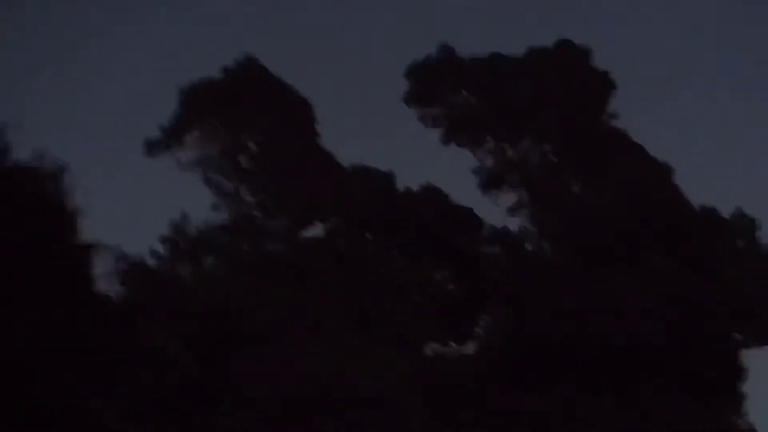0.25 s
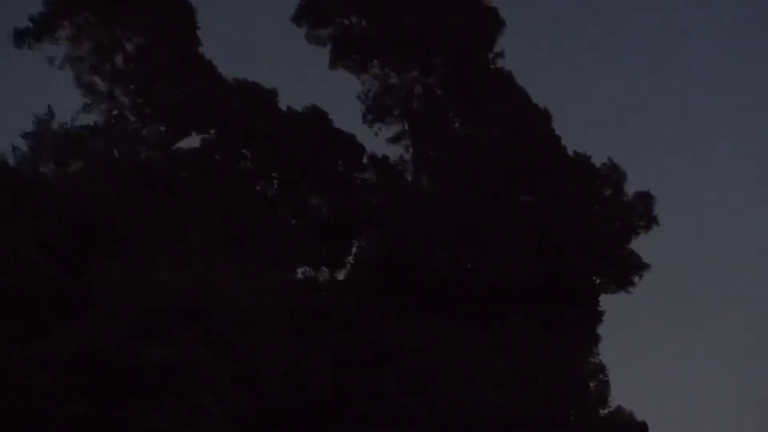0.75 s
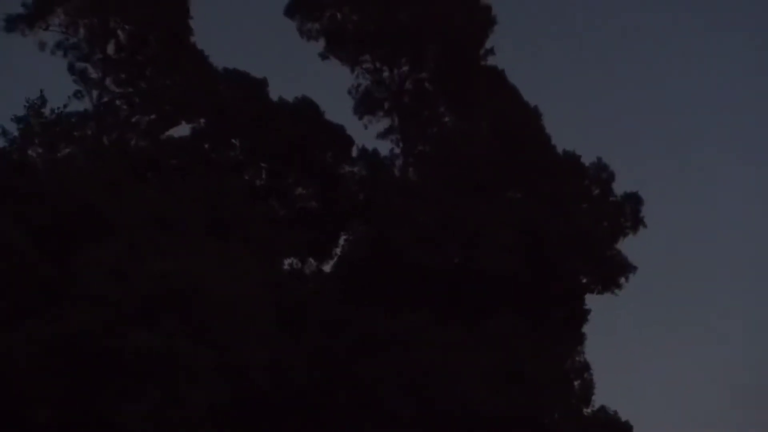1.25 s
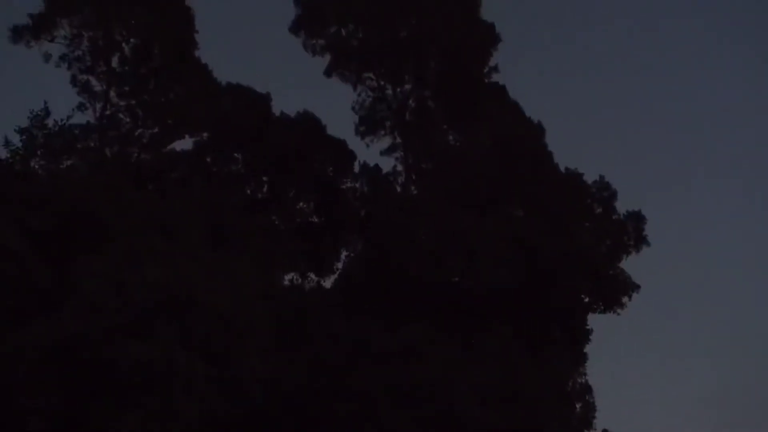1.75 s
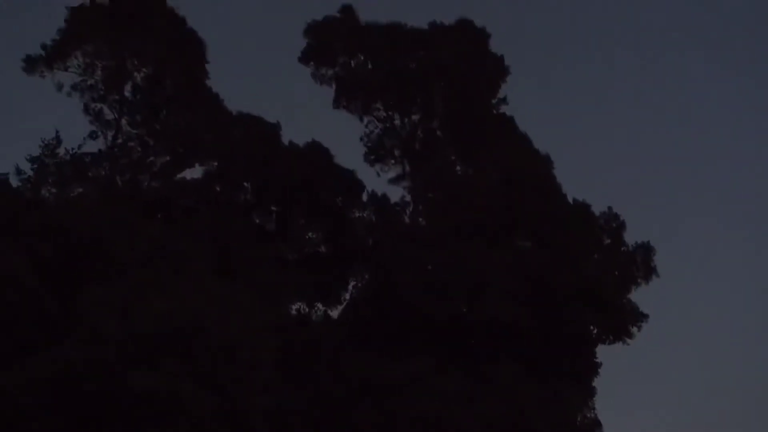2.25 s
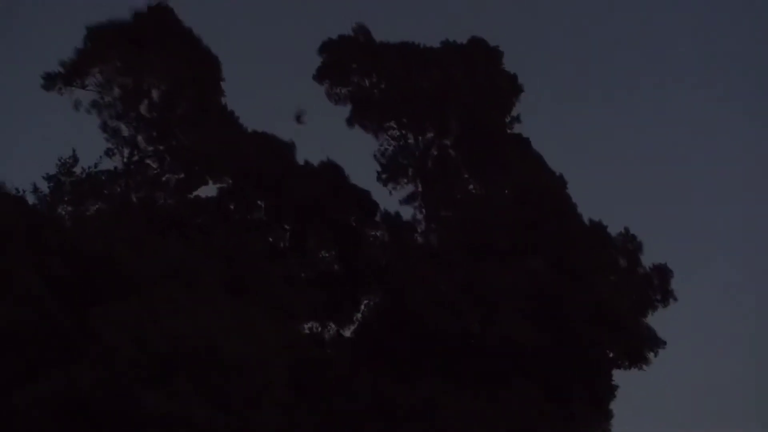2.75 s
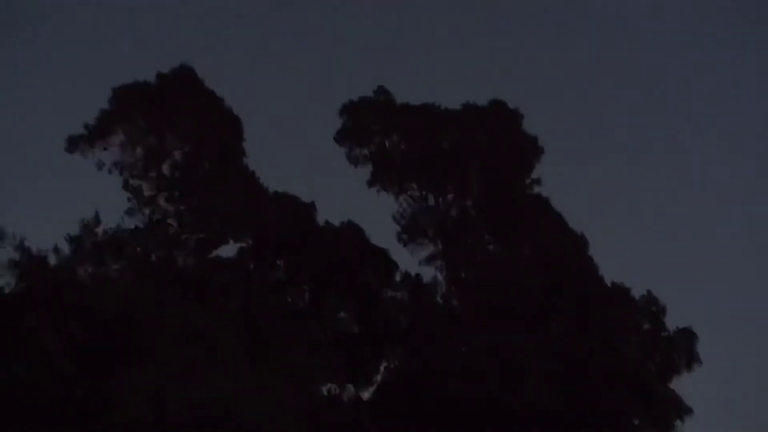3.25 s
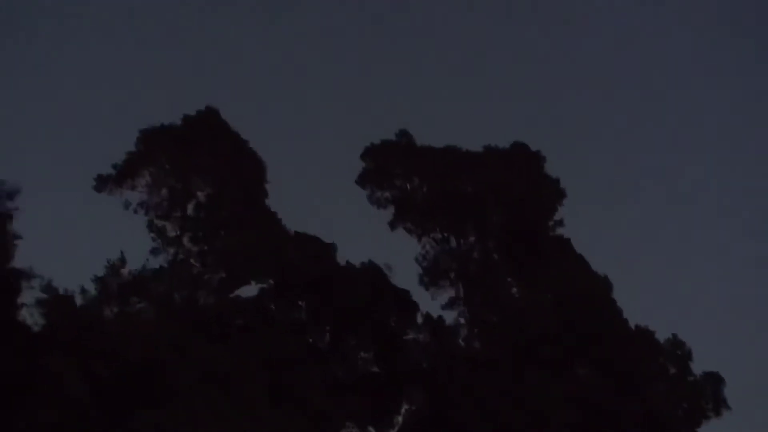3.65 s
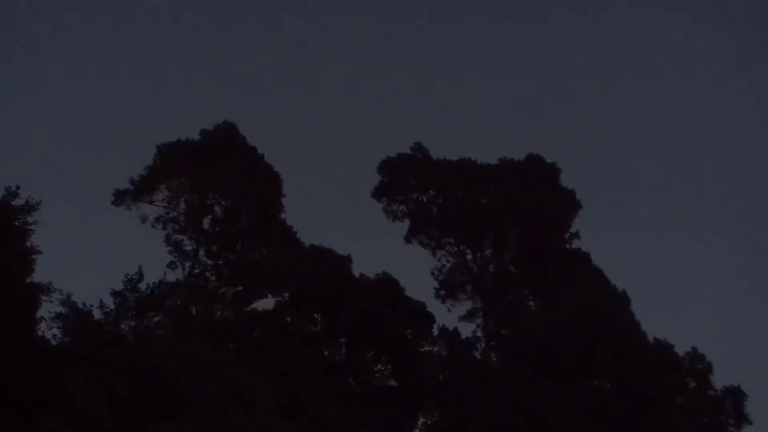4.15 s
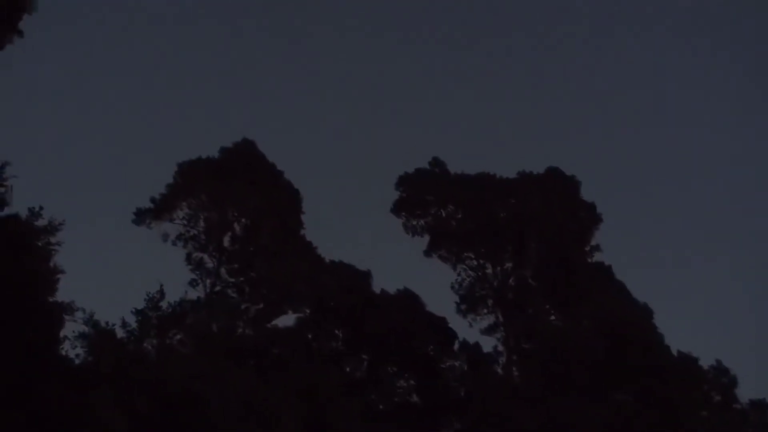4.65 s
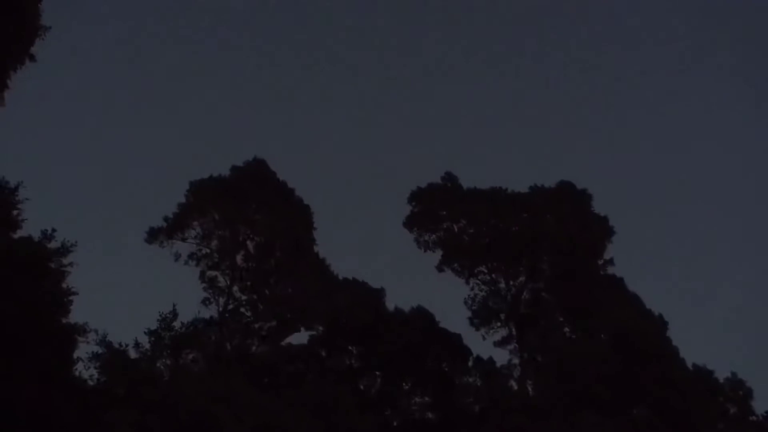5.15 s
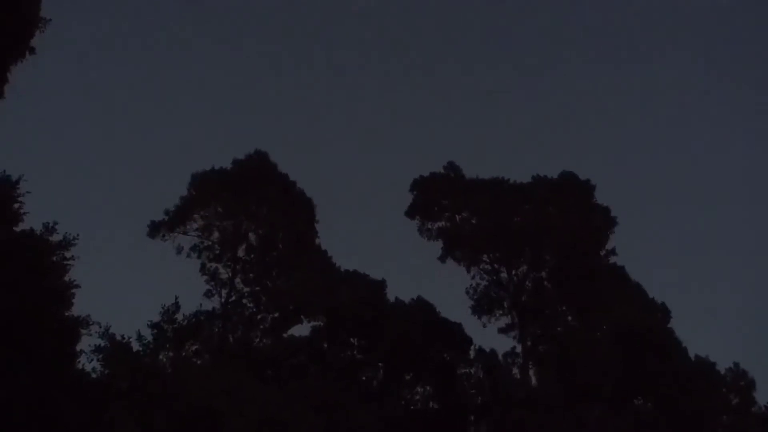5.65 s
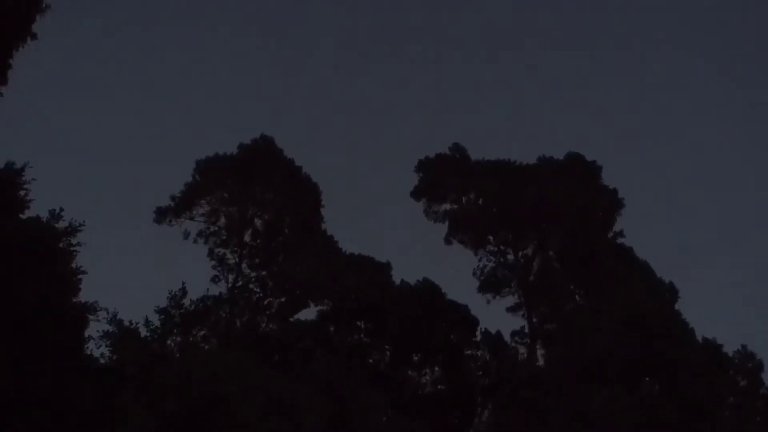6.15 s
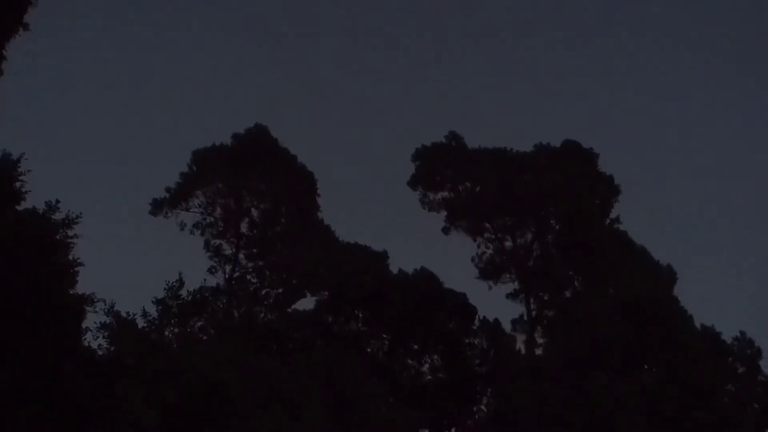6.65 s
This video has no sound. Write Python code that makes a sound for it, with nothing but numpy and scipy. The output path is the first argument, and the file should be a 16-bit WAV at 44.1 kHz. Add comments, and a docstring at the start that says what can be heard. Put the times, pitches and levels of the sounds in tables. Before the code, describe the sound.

Evening chatter of mynas roosting in tall trees, about seven seconds, outdoors in stereo. From the start a close bird pours out very short, bright syllables around 2.5 to 4 kHz: zigzag trills, flicked warbles, stepped falling calls, hooked notes and smooth slides, several per second, some pure and some raspy. Nearby birds trill across it. A distant mass of thin gliding chirps swells in the first second, peaks near 1 s, then recedes behind. At about 1.2 s a brief low puff of wind buffets the microphone, mostly on the left. Around 2.5 s come strong, tightly repeated chirps, then a long downward swoop near 2.8 s. Near 4.5 s a faint high whistle drifts up. Calls stay busy until about 6.1 s, then become sparse and weaker. Branches return rough little echoes and a short diffuse tail. A quiet low rumble with slight hiss grows very slowly while a faint hum fades.

```python
"""Mynas chatter in tall trees at dusk, over a low outdoor rumble that grows slowly and a hum that fades. From
the start a near bird, a gliding tone in a resonant throat, strings together trills, warbles, stair calls, hooks
and slurs; the other side of its syrinx trills across them, and the far roost, pure gliding tones, is loudest
early on. Just after one second a puff of wind, shaped noise, buffets the microphone; near 4.5 s a thin whistle
drifts up. Throughout, branches and canopy scatter the calls into separate echoes and a dense tail."""
import sys
import numpy as np
from scipy import signal
from scipy.fft import rfft, irfft
from scipy.io import wavfile
from scipy.ndimage import uniform_filter1d

SR = 44100
rng = np.random.default_rng(int(sys.argv[2]) if len(sys.argv) > 2 else 0)


def to_wav(sig):
    """Store sig (one row per channel, or 1-D mono) as 16-bit WAV at the path in sys.argv[1].

    Samples outside -1..1 are clipped; the rate is SR.
    """
    pcm = np.clip(np.atleast_2d(sig), -1, 1) * 32767
    pcm = np.round(pcm).astype(np.int16)
    wavfile.write(sys.argv[1], SR, pcm.T)  # frames by channels


N = 303849  # samples

# In the five call tables the level is that before throat and effort act, and the rasp is relative to it.
# Trills, the pitch zigzagging about a rising centre. Each row: start in seconds, length in seconds,
# swings per second, centre pitch in Hz, level in dB, rasp in dB.
TRILLS = [(0.116, 0.065, 90, 2936, -22.5, -20), (0.046, 0.086, 68, 2400, -30, -30),
          (0.97, 0.042, 74, 2880, -29.5, -45), (1.024, 0.06, 76, 2860, -18, -28.5),
          (1.249, 0.046, 96, 2936, -28.5, -26), (1.509, 0.0564, 72, 2957, -17.5, -30),
          (1.754, 0.063, 62, 3070, -19.5, -16), (1.931, 0.044, 88, 3070, -26.5, -22),
          (2.188, 0.06, 66, 2850, -15, -32.5), (2.469, 0.058, 67, 3100, -23, -14.5),
          (2.722, 0.029, 73.6, 2326, -28, -49), (2.75, 0.032, 44, 3500, -28.5, -51),
          (2.823, 0.049, 54, 3000, -17.5, -33), (3.373, 0.056, 52, 3080, -25.5, -11),
          (3.688, 0.062, 71, 2582, -18, -32), (4.275, 0.058, 79, 2506, -15.5, -35),
          (4.677, 0.067, 78, 2913, -21, -34), (4.88, 0.058, 81, 2600, -19.5, -32),
          (5.347, 0.052, 61, 2700, -21, -29), (5.513, 0.0654, 88, 2625, -20, -32),
          (5.604, 0.04, 48, 3305, -21.5, -25), (5.679, 0.049, 48, 2965, -20, -21),
          (5.969, 0.078, 50, 2110, -27, -34.5)]
TRILL_DEPTH, TRILL_RISE = 0.2034, 0.1456  # shares of the centre pitch: swing to each side, climb over the trill
TRILL_UNEVEN = 0.22  # how much the swings differ in depth

# Warbles, an opening note and then a low note flicked upward. Each row: start in seconds,
# opening length in seconds, opening pitch in Hz, low pitch in Hz, level in dB, rasp in dB.
WARBLES = [(1.587, 0.013, 2500, 2358, -18, -24), (2.27, 0.013, 2643, 2403, -16.5, -27.5),
           (2.898, 0.013, 2636, 2436, -16.5, -28.5), (3.962, 0.023, 3360, 2617, -14, -32.5),
           (4.118, 0.016, 3600, 2550, -20, -28), (4.554, 0.02, 3436, 2580, -16, -31),
           (5.172, 0.021, 3350, 2546, -17.5, -31.5), (5.757, 0.0091, 2950, 2408, -20, -20.5),
           (5.815, 0.021, 3350, 2550, -16.5, -34)]
# Flicks of every warble. Each row: time after the opening note in seconds, height in Hz before the
# pitch is smoothed, half width in seconds.
FLICKS = [(0.016, 1434, 0.0065), (0.038, 1400, 0.0087), (0.064, 510, 0.002)]
WARBLE_S, WARBLE_SAG = 0.068, 0.2  # length of the low note in seconds, share of its pitch that it loses

# Stairs, held notes parted by dips. Each row: start in seconds, length in seconds, number of steps,
# pitches in Hz where the staircase sets out and ends, dip as a share of pitch, level in dB, rasp in dB.
STAIRS = [(0.21, 0.088, 3, 4225, 2590, 0.3, -19, -25.5), (0.445, 0.047, 3, 3175, 3214, 0.16, -19, -24.5),
          (0.736, 0.1, 4, 4890, 2627, 0.31, -17.5, -26.5), (1.287, 0.094, 4, 5060, 2986, 0.24, -16, -18.5),
          (1.796, 0.1, 4, 4800, 2797, 0.24, -16, -20), (2.063, 0.12, 2, 3878, 2476, 0.33, -21, -15.5),
          (2.568, 0.033, 2, 3484, 3420, 0.27, -19.5, -20), (3.216, 0.122, 3, 3136, 2348, 0.34, -19, -69),
          (3.774, 0.044, 2, 3300, 2605, 0.29, -17, -29), (4.368, 0.084, 3, 3198, 2660, 0.35, -17, -35),
          (5.003, 0.082, 3, 3175, 2697, 0.37, -17.5, -38), (6.089, 0.048, 2, 3100, 2197, 0.33, -20.5, -33),
          (6.26, 0.089, 3, 3740, 2530, 0.34, -25.5, -30.5), (6.79, 0.046, 2, 3094, 2040, 0.2, -29.5, -23)]
STEP_HOLD, STEP_EDGE = 0.63, 0.0916  # shares of a step: the held note, the leap to or from it
STEP_DROOP = 0.354  # 0 holds each step level, 1 lets it slide into the next

# Hooks, a low grace note leaping to a held note that bends down. Each row: start in seconds,
# grace length in seconds, held length in seconds, held pitch in Hz, level in dB, rasp in dB.
HOOKS = [(0.52, 0.017, 0.062, 3170, -19, -29), (1.094, 0.02, 0.059, 3205, -16, -30),
         (3.444, 0.019, 0.032, 3330, -25, -16.5), (6.025, 0.013, 0.05, 3338, -21.5, -21.5),
         (4.764, 0.017, 0.037, 3194, -19.5, -31.5), (5.426, 0.021, 0.032, 3167, -20, -25)]
GRACE_HZ, HOOK_BEND = 2362, 0.18  # pitch of the grace note; share of the held pitch lost in the bend
HOOK_NOTCH, NOTCH_S = 0.1177, 0.00382  # catch halfway through the held note: share of pitch, half width in s

# Slurs, single even glides. Each row: start in seconds, length in seconds, first pitch in Hz,
# last pitch in Hz, level in dB, rasp in dB.
SLURS = [(0.219, 0.024, 3894, 2406, -18.5, -18), (0.413, 0.03, 2490, 2390, -17, -34),
         (0.403, 0.034, 3410, 3224, -25, -26.5), (0.52, 0.0186, 3540, 4340, -22.5, -24),
         (0.57, 0.052, 4630, 3540, -23.5, -23), (1.683, 0.058, 3920, 2100, -22.5, -26),
         (2.003, 0.058, 2750, 1630, -24.5, -37), (2.497, 0.03, 2956, 2920, -13, -28),
         (2.525, 0.026, 2970, 2950, -12.5, -29), (2.556, 0.0193, 2760, 2660, -13.5, -22.5),
         (2.784, 0.076, 3885, 1375, -16, -37), (3.167, 0.0085, 2860, 2480, -25.5, -39),
         (3.206, 0.057, 4150, 3000, -23, -28.5), (3.449, 0.016, 4820, 4300, -23.5, -7.5),
         (3.641, 0.035, 2640, 2600, -36, -44), (3.74, 0.03, 3060, 3120, -26, -18.5),
         (3.771, 0.033, 3904, 3450, -20.5, -24), (3.951, 0.0045, 3700, 3560, -18, -40),
         (4.361, 0.023, 4080, 3530, -15.5, -25), (4.541, 0.0048, 3840, 3630, -21, -40),
         (4.97, 0.03, 4006, 3493, -20.5, -24), (5.342, 0.049, 3810, 4110, -21.5, -22),
         (5.392, 0.035, 3345, 3190, -26, -15), (5.65, 0.032, 1934, 2276, -19, -29),
         (5.723, 0.078, 2943, 2914, -24.5, -23), (5.761, 0.019, 4695, 4060, -20, -16),
         (6.19, 0.069, 3700, 1880, -37.5, -31)]

FALL_S, FALL_END_HZ = 0.04, 1117  # warbles, stairs and hooks all end in a fall
LEAP_S = 0.0038  # time the syrinx takes to leap between two notes

# Throat and beak resonance, favouring the main tone near 3 kHz. Each row: frequency in Hz, gain in dB.
THROAT = [(900, -19.5), (1500, -14), (2100, -7), (2500, 0), (2950, 3.5), (3900, -1), (5000, -3)]
# Colour of the rasp. Each row: frequency in Hz, gain in dB.
OVERTONES = [(1500, -3), (4400, 2.5), (5600, -2.5), (7000, -3), (8400, -9), (10200, 0.5), (11800, -12),
             (13700, -5.5), (15500, -27)]
EDGE_HZ = 15900  # upper band limit

# The second syrinx voice: level against the call in dB, dB gained per dB of rasp
SECOND_DB, SECOND_PER_RASP = -3, 0.25
SECOND_HZ, SECOND_RATE = (2320, 4283), (25, 98)  # ranges of centre pitch and of swings per second

# Thin high whistle of another bird. Each row: time in seconds, pitch in Hz, level in dB.
WHISTLE = [(4.46, 4640, -52), (4.53, 4840, -39), (4.64, 5160, -61)]
# Level of the far roost. Each row: time in seconds, level in dB.
ROOST = [(0, -60), (0.15, -35), (0.7, -32.5), (0.88, -42), (1.05, -30.5), (1.5, -40.5), (6.4, -46.5)]
# Where the chatter lies as the microphone turns. Each row: time in seconds, left minus right in dB.
BEARING = [(0.1, -2.5), (0.8, 0.1), (5.3, 0.5), (5.8, -0.5)]
# Decay of the tail among the trees. Each row: frequency in Hz, time to fall by 60 dB in seconds.
CANOPY = [(3000, 0.38), (14000, 0.28)]

HUM_HZ, HUM_DB, HUM_FADE_DB_PER_S = 138.3, -41, 4  # HUM_DB is the level at the start
# Wind buffets. Each row: time of the peak in seconds, level in dB before the gain of each port,
# standard deviation of the swell in seconds.
BUFFETS = [(1.157, -18.5, 0.0039), (1.214, -23.5, 0.049)]
# Colour of the wind noise. Each row: frequency in Hz, relative level in dB.
BUFFET_COLOUR = [(25, -17), (130, 1), (900, -54)]
# Colour of the outdoor background. Each row: frequency in Hz, relative density in dB per Hz.
AIR = [(25, -9.5), (80, 1.5), (160, -6), (300, -15.5), (600, -18), (1600, -15), (5800, -31), (15500, -34)]
# Coherence of the background at the two ports. Each row: frequency in Hz, left-right likeness.
AIR_LIKENESS = [(100, 0.86), (1000, 0.7), (8000, 0.025)]
AIR_DB, AIR_RISE_DB_PER_S = -40, 0.17  # level midway through, and its slow growth


def amp(db):
    """Decibel law: 20 dB is a tenfold gain."""
    return 10 ** (np.asarray(db) / 20)


def evened(x):
    """Normalization to unit root-mean-square."""
    return x / np.sqrt(np.mean(x ** 2) + 1e-20)


def read(points, hz):
    """Interpolation of a (Hz, value) table on a log-frequency axis."""
    f, value = np.transpose(points)
    return np.interp(np.log(hz + 1), np.log(f), value)


def add(mix, s, sound):
    """Superposition: a sound is added into the mix from time s on."""
    part = mix[..., max(round(s * SR), 0):][..., :sound.shape[-1]]
    part += sound[..., :part.shape[-1]]


def noise(colour, size):
    """Spectral shaping of white noise, brought to rms 1."""
    spectrum = rfft(rng.standard_normal(size))
    gain = amp(read(colour, np.fft.rfftfreq(size, 1 / SR)))
    return evened(irfft(spectrum * gain, size))


def wobble(length, size):
    """Smoothed random motion of rms 1 that changes over about size samples."""
    once = uniform_filter1d(rng.standard_normal(length), size)
    return evened(uniform_filter1d(once, size))


def clock(length):
    """Time in seconds through a note, and the share of it that has passed."""
    t = np.arange(0, length, 1 / SR)
    return t, t / length


def near_birds():
    """Superposition of the close chatter, syllable by syllable."""
    out = np.zeros(N)
    for s, hz, db, rasp_db in calls():
        add(out, s, syllable(hz, db, rasp_db))
    return out


def calls():
    """Pitch control: every near call as (start s, pitch curve in Hz, level dB, rasp dB)."""
    kinds = [(trill, TRILLS), (warble, WARBLES), (stairs, STAIRS), (hook, HOOKS), (slur, SLURS)]
    found = []
    for pitch, rows in kinds:
        for s, *shape, db, rasp_db in rows:
            found.append((s, pitch(*shape), db, rasp_db))
    return found


def syllable(hz, db, rasp_db, swell_db=6, sweep_db=4, lift_db=14, hiss_db=-17, half_db=-18,
             sputter_db=5, grit_db=4, tremble_db=1.19, jitter=0.0073):
    """Source and filter: a gliding tone flares at the throat resonance; forced, it sputters overtones."""
    t = np.arange(len(hz)) / SR
    hz = uniform_filter1d(hz, size=70)
    forced = np.clip((rasp_db + 38) / 15, 0, 1)
    # effort swells toward the middle and lifts with each upward flick; fast sweeps are weaker
    swell = (2 * t / t[-1] - 1) ** 2
    sweeping = uniform_filter1d(np.tanh(abs(np.gradient(hz, t)) / 860000.0), size=90)  # Hz per s
    flick = np.log2(hz / uniform_filter1d(hz, size=1100))
    fade = signal.windows.tukey(len(t), .004 / t[-1])
    effort = fade * amp(lift_db * flick - swell_db * swell - sweep_db * sweeping)
    # the syrinx trembles in pitch and strength, more when forced
    hz = hz * (1 + jitter * (1 + forced) * wobble(len(t), size=24))
    tremble = amp(tremble_db * (1 + forced) * wobble(len(t), size=70))
    phase = 2 * np.pi * np.cumsum(hz) / SR
    tone = amp(read(THROAT, hz)) * tremble * np.sin(phase)
    # overtones, weak half overtones and a little hiss, all in short grains
    rasp = amp(hiss_db) * noise(OVERTONES, len(t))
    for k in np.arange(1.5, 6.5, .5):
        sputter = np.tanh(wobble(len(t), size=110))
        level_db = read(OVERTONES, k * hz) + half_db * (k % 1 > 0) + sputter_db * sputter
        rasp = rasp + amp(level_db) * (k * hz < EDGE_HZ) * np.sin(k * phase)
    grit = amp(grit_db * np.tanh(wobble(len(t), size=24)))
    slack = np.minimum(hz / 2300, 1)  # the voice fades as it falls, overtones first
    return amp(db) * effort * slack * (tone + amp(rasp_db) * slack ** 4 * grit * rasp)


def trill(length, rate, centre_hz):
    """Frequency modulation: a zigzag of uneven depth about a centre that climbs a little."""
    t, u = clock(length)
    depth = TRILL_DEPTH * (1 + TRILL_UNEVEN * np.tanh(wobble(len(t), size=400)))
    phase = 2 * np.pi * rate * t + 0.404 * wobble(len(t), size=400)
    zigzag = signal.sawtooth(phase, .5)
    return centre_hz * (1 + TRILL_RISE * (u - .5)) * (1 + depth * zigzag)


def warble(opening_s, opening_hz, low_hz):
    """Register leap: the opening note gives way to a sagging low note with sharp upward flicks."""
    t = clock(opening_s + WARBLE_S)[0] - opening_s
    low = low_hz * (1 - WARBLE_SAG * (t / WARBLE_S) ** 2)
    flicks = sum(height * np.maximum(1 - abs(t - s) / half, 0) for s, height, half in FLICKS)
    return with_fall(leap(t, opening_hz, low) + flicks)


def stairs(length, steps, first_hz, last_hz, dip):
    """Stepwise pitch: held notes spaced by equal ratios, parted by swoops, ending in a fall."""
    place = steps * clock(length)[1]
    middle = np.floor(place) + .5
    descent = (middle + STEP_DROOP * (place - middle)) / steps
    dips = (1 + np.tanh((abs(place - middle) - STEP_HOLD / 2) / STEP_EDGE)) / 2
    return with_fall(first_hz * (last_hz / first_hz) ** descent * (1 - dip * dips))


def hook(grace_s, held_s, held_hz):
    """Register leap up to a note that catches once and bends over."""
    t = clock(grace_s + held_s)[0] - grace_s
    notch = HOOK_NOTCH * np.exp(-((t - held_s / 2) / NOTCH_S) ** 2)
    bend = HOOK_BEND * abs(t / held_s) ** 3
    return with_fall(leap(t, GRACE_HZ, held_hz * (1 - bend - notch)))


def slur(length, from_hz, to_hz):
    """Exponential glide: equal musical intervals in equal times."""
    return from_hz * (to_hz / from_hz) ** clock(length)[1]


def leap(t, from_hz, to_hz):
    """Sigmoid transition: a quick change of note at t = 0."""
    return from_hz + (to_hz - from_hz) * (1 + np.tanh(t / LEAP_S)) / 2


def with_fall(hz):
    """Relaxation of the syrinx: at the end of a call the pitch slides away."""
    return np.append(hz, np.geomspace(hz[-1], FALL_END_HZ, round(FALL_S * SR)))


def second_voice():
    """Superposed voices: the other side of the near bird's syrinx trills across each call, louder the harsher
    the call."""
    out, sung = np.zeros(N), calls()
    for (s, hz, db, rasp_db), (fast, high) in zip(sung, rng.random((len(sung), 2))):
        rate = np.interp(fast, (0, 1), SECOND_RATE)
        centre_hz = np.interp(high, (0, 1), SECOND_HZ)
        crossing = trill(0.65 * len(hz) / SR, rate, centre_hz)
        add(out, s, syllable(crossing, db + SECOND_DB + SECOND_PER_RASP * rasp_db, rasp_db))
    return out


def whistler():
    """Pure tone: a faint whistle whose frequency drifts upward."""
    s, hz, db = np.transpose(WHISTLE)
    t = np.arange(N) / SR
    phase = 2 * np.pi * np.cumsum(np.interp(t, s, hz)) / SR
    return amp(np.interp(t, s, db, -120, -120)) * np.sin(phase)


def roost(count=520, spread_db=14):
    """Random superposition: far birds sing the same repertoire at random moments, levels and pitches."""
    out, tunes = np.zeros(N), [call[1] for call in calls()]
    for when, which, loud, high in rng.random((count, 4)):
        hz = tunes[int(which * len(tunes))] * (1 + 0.35 * (high - .5))
        shape = amp(spread_db * loud + read(THROAT, hz)) * signal.windows.tukey(len(hz))
        add(out, when * N / SR, shape * np.sin(2 * np.pi * np.cumsum(hz) / SR))
    return evened(out) * amp(np.interp(np.arange(N) / SR, *np.transpose(ROOST)))


def ports(x):
    """Interaural-like differences: two ports differ in level and phase, changing toward the treble."""
    hz = np.fft.rfftfreq(N, 1 / SR)
    lean_db = read([(2000, -1.5), (8000, 4.0)], hz)  # left minus right
    lead = read([(4000, 0.51), (9000, 1.0)], hz)  # radians
    tilt = amp(lean_db / 2) * np.exp(.5j * lead)
    return irfft(rfft(x) * np.array([tilt, 1 / tilt]), N)


def turned(x):
    """Level panning: the direct sound leans left or right as the microphone turns."""
    lean_db = np.interp(np.arange(N) / SR, *np.transpose(BEARING))
    return x * amp([lean_db / 2, -lean_db / 2])


def branches(x, count=40, reach_s=0.066):
    """Early reflection: nearby branches return a spray of separate echoes that roughens each syllable."""
    taps = np.zeros((2, SR))
    for when, sign, side in rng.random((count, 3)):
        angle = side * np.pi / 2
        pan = np.array([np.cos(angle), np.sin(angle)])
        taps[:, round((.004 + when * reach_s) * SR)] += np.sign(sign - .5) * (1 - when) * pan
    return signal.fftconvolve(x[None], taps * np.sqrt(2) / np.linalg.norm(taps), axes=1)[:, :N]


def canopy(x, build_s=0.0008):
    """Diffuse scattering: leaves and trunks spread sound into a tail that dies faster in the treble."""
    # one echo of random sign at a random place in every 20 samples
    at = np.arange(0, SR - 20, 20) + rng.integers(0, 20, (2, (SR - 1) // 20))
    taps = np.zeros((2, SR))
    np.put_along_axis(taps, at, rng.choice([-1., 1.], at.shape), 1)
    hz, t, z = signal.stft(taps, SR, nperseg=256)
    decay = amp(-60 * t / read(CANOPY, hz)[:, None])
    build = 1 - np.exp(-t / build_s)
    tail = signal.istft(z * decay * build, SR, nperseg=256)[1]
    tail = tail + 0.023 * tail[::-1]  # the two ports hear partly the same scatter
    return signal.fftconvolve(x[None], tail / np.linalg.norm(tail[0]), axes=1)[:, :N]


def wind(left_db=3, right_db=-8):
    """Turbulent pressure: a short puff buffets mostly the left port."""
    t = np.arange(N) / SR
    push = sum(amp(db) * np.exp(-.5 * ((t - s) / half) ** 2) for s, db, half in BUFFETS)
    return push * np.array([amp(db) * noise(BUFFET_COLOUR, N) for db in (left_db, right_db)])


def hum():
    """Exponential decay: a faint low tone of wavering phase dies away."""
    t = np.arange(N) / SR
    return amp(HUM_DB - HUM_FADE_DB_PER_S * t) * np.sin(2 * np.pi * HUM_HZ * t + wobble(N, size=2000))


def air():
    """Partial coherence: low rumble and faint hiss, slowly growing, are partly shared by the ports."""
    same = np.clip(read(AIR_LIKENESS, np.fft.rfftfreq(N, 1 / SR)), -1, 1)
    left, other = noise(AIR, N), noise(AIR, N)
    right = irfft(same * rfft(left) + np.sqrt(1 - same ** 2) * rfft(other), N)
    rise_db = AIR_RISE_DB_PER_S * (np.arange(N) - N / 2) / SR
    return amp(AIR_DB + rise_db) * np.array([left, right])


def scene(wet_db=-20, roost_wet_db=-3, early_db=-13):
    """Direct and scattered fields: all birds reach the ports both ways, the far roost with a stronger tail."""
    far = roost()
    birds = near_birds() + second_voice() + whistler() + far
    # off the beak's axis the 3 kHz peak is weaker, so the scattered sound is broader in colour
    off_axis_db = read([(2000, 3), (3000, -2), (4300, 6), (9000, 6)], np.fft.rfftfreq(N, 1 / SR))
    scattered = irfft(rfft(birds) * amp(off_axis_db), N)
    direct = turned(ports(birds))
    early = amp(early_db) * branches(scattered)
    late = canopy(amp(wet_db) * scattered + amp(roost_wet_db) * far)
    return direct + early + late + wind() + hum() + air()


def record(dry):
    """Low-pass filtering: the recorder's band limit."""
    lowpass = signal.firwin(511, EDGE_HZ, window=("kaiser", 9), fs=SR)
    return signal.oaconvolve(dry, lowpass[None], "same")


dry = scene()
out = record(dry)
to_wav(out)
```